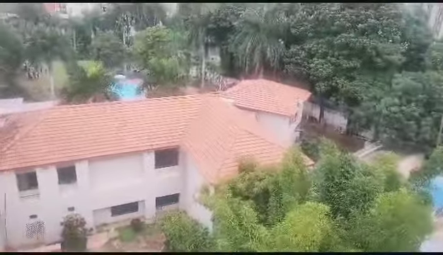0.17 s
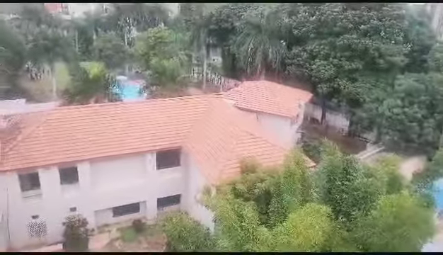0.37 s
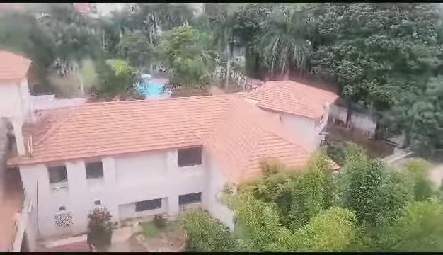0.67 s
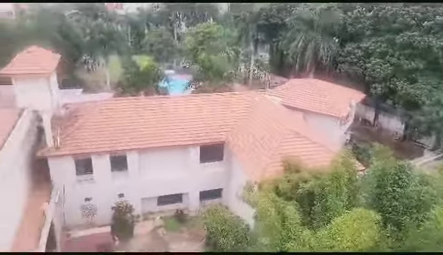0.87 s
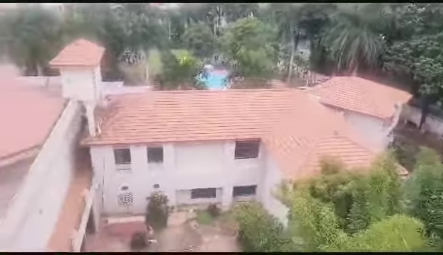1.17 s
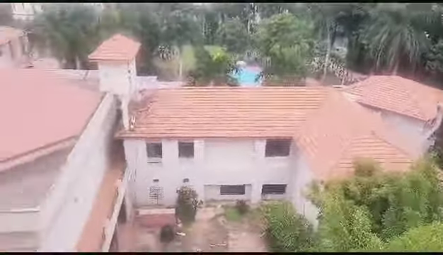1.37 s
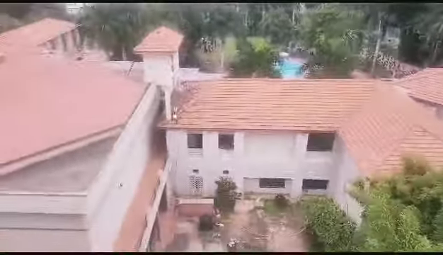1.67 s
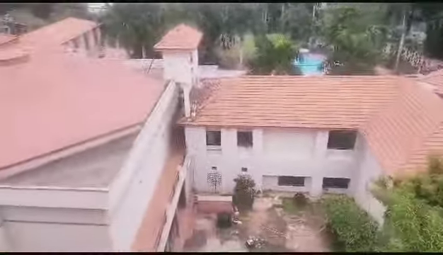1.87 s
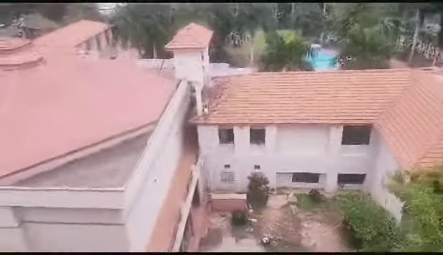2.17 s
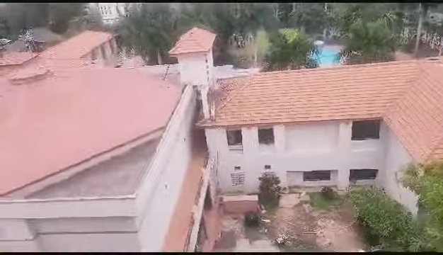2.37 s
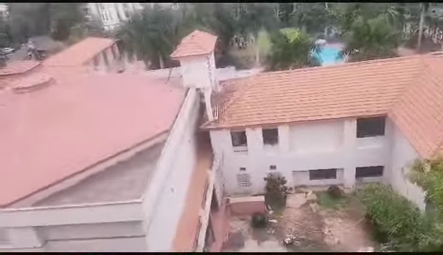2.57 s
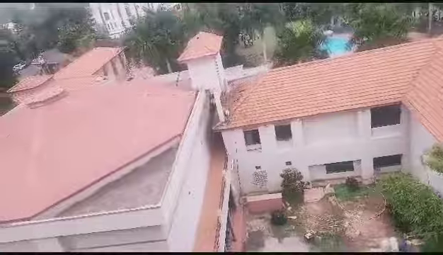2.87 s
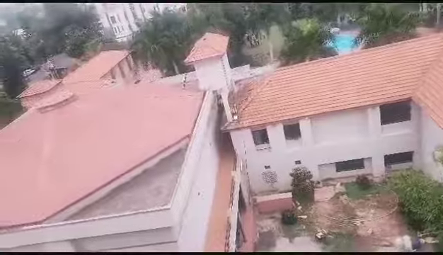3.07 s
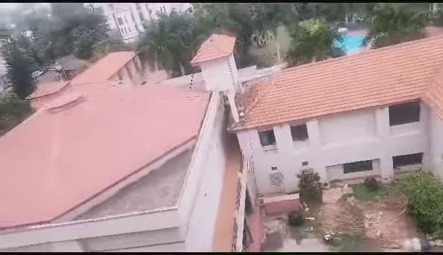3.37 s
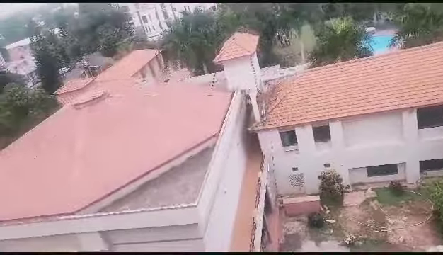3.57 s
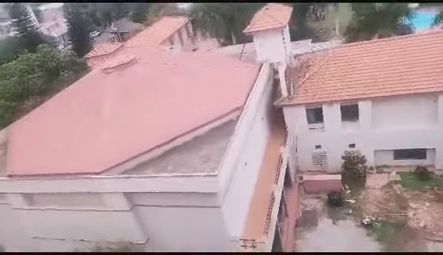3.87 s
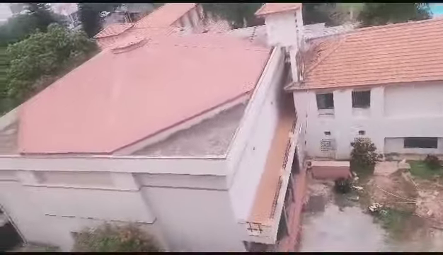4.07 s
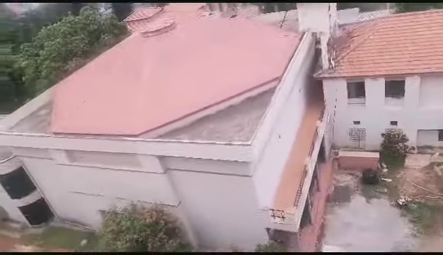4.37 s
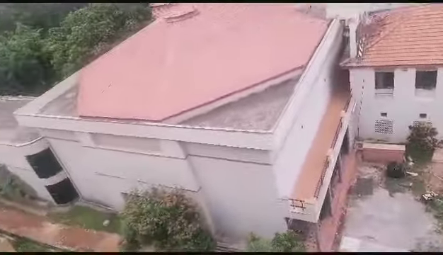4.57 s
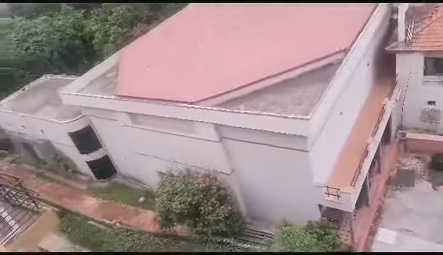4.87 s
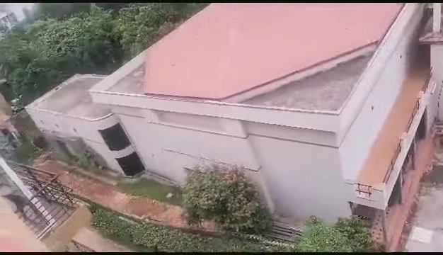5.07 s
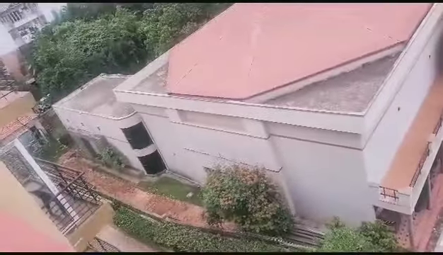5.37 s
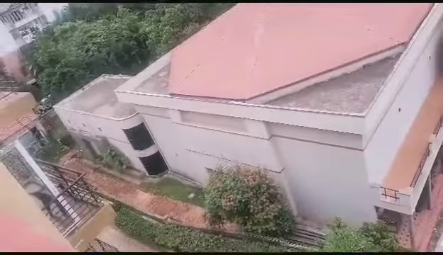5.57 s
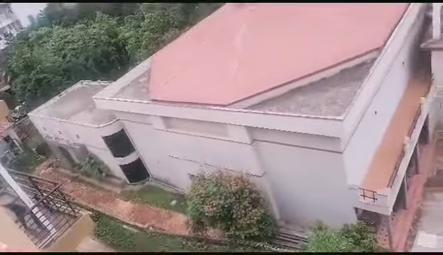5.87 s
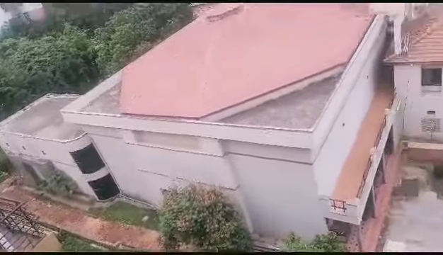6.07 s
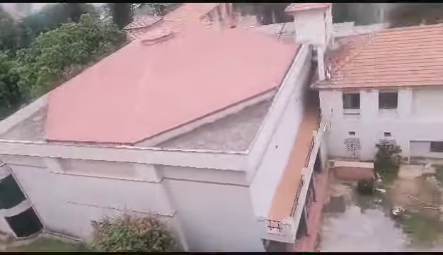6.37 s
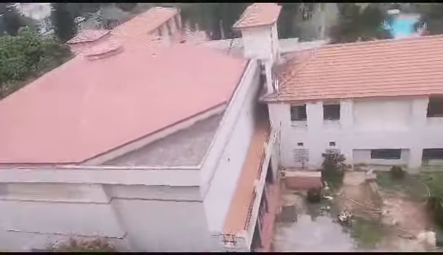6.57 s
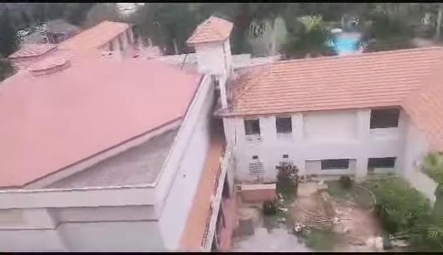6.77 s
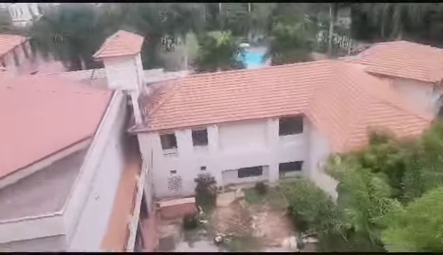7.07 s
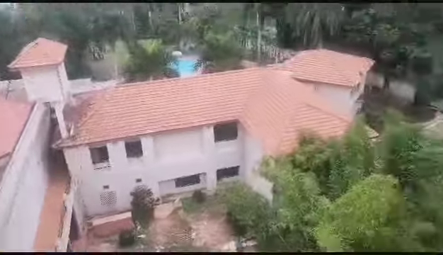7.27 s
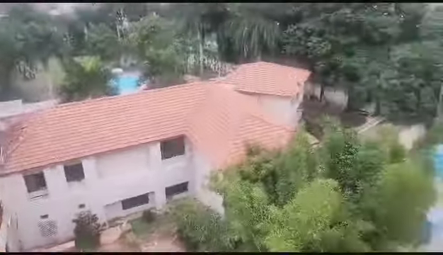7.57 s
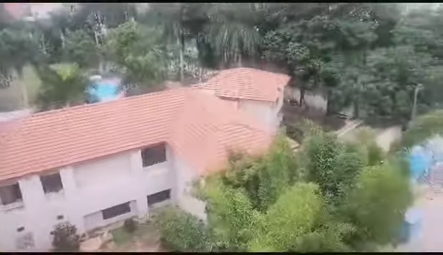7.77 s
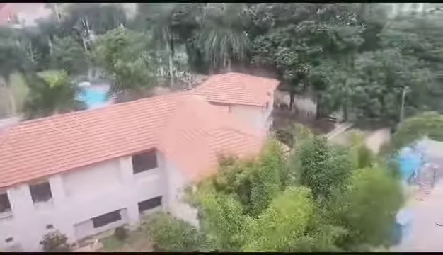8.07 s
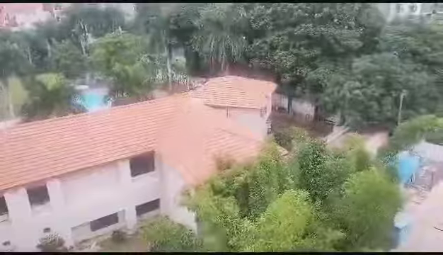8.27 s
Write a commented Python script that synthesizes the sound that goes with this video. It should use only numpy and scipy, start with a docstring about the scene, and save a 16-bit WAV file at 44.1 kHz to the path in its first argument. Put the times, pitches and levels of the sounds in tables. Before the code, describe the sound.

Rapid, steady demolition pounding reverberates among buildings and trees, distant but strong, over a rumbling engine and soft hiss. A few falling bird chirps slip between blows. The hammer slackens slightly in pitch and ceases, followed by gliding whistles, brief wind buffets, hollow swishing and rustling fingers on the stereo microphone. The machine noise dies down and one last bird whistles clearly.

```python
"""Courtyard from high above: a hydraulic breaker pounds about seven times a second, then stops.
Blows are short low sine pulses on several wall paths, with a scattered noise tail and yard resonances.
The chisel rings as narrow-band noise; engine rumble, roar, din and hiss are shaped noise.
The camera pans and turns back with a hollow swish, hand brushes and wind puffs, all swelling noise.
Birds in the trees whistle and chirp as gliding sines and rasp as pulsing noise."""
import sys
import numpy as np
from scipy import signal
from scipy.fft import rfft, irfft, next_fast_len
from scipy.io import wavfile
from scipy.ndimage import uniform_filter1d, map_coordinates

SR = 44100
rng = np.random.default_rng(int(sys.argv[2]) if len(sys.argv) > 2 else 0)


def unload_wav(signal):
    """Save mono or channel-first audio to the path in sys.argv[1] as 16-bit WAV at rate SR, clipped to [-1, 1]."""
    wavfile.write(
        sys.argv[1],
        SR,
        np.round(np.clip(np.atleast_2d(signal).T, -1, 1) * 32767).astype(np.int16),
    )


N = 371322
SIZE = next_fast_len(N, True)
TIME, HZ = np.arange(N) / SR, np.fft.rfftfreq(SIZE, 1 / SR)
# In all tables: levels are relative, half lengths are to 1/e, widths are nominal.

# piston blows: t/s, level/dB, first echo/dB
BLOWS = [(0.0104, -14.5, -4.0), (0.1691, -13.5, 0.0), (0.3173, -9.5, -5.5), (0.4572, -9.5, -3.5),
         (0.5952, -10.0, -0.5), (0.7366, -6.5, -3.5), (0.8807, -8.0, -1.0), (1.0257, -8.5, 0.5),
         (1.171, -9.0, 0.0), (1.3178, -8.0, -1.0), (1.4702, -9.5, 1.5), (1.621, -9.5, 1.0),
         (1.7706, -6.5, -2.0), (1.9187, -7.5, -1.0), (2.064, -9.5, 2.5), (2.2086, -7.5, -0.5),
         (2.3526, -8.5, 0.5), (2.4967, -8.0, 0.5), (2.641, -8.5, 0.0), (2.7853, -10.0, 1.5),
         (2.9285, -9.0, 0.5), (3.0706, -7.5, -1.0), (3.213, -6.5, -0.5), (3.3551, -7.0, -1.0),
         (3.4992, -7.5, -1.0), (3.6457, -7.5, -2.0), (3.7939, -7.0, -3.5), (3.9426, -7.5, -3.0),
         (4.0909, -7.5, -3.0), (4.2401, -8.5, -0.5), (4.3918, -10.0, 2.0), (4.5466, -9.0, -1.5),
         (4.6985, -9.5, 0.5), (4.8474, -9.0, -1.5), (4.9938, -7.5, -4.0), (5.1394, -9.5, 0.0),
         (5.286, -9.5, -1.5), (5.4342, -9.0, -3.0), (5.5838, -9.5, -2.0), (5.7346, -9.5, -1.0),
         (5.8864, -10.0, -0.5), (6.0392, -8.5, -0.5), (6.1928, -9.0, -3.0), (6.3519, -11.0, -2.0),
         (6.5137, -10.0, -6.0), (6.6734, -11.0, -3.0)]
# ground boom under a blow: t/s, level/dB
GROUND_BOOM = [(0, -11), (.7, -21), (1.8, -21), (2.2, -28), (3.8, -26), (4.6, -16), (5.2, -25), (5.8, -20)]
# the boom pulse: delay/s, f/Hz, half length/s
BOOM_PULSE = (0.05, 66, 0.043)
# direct path, then wall paths: delay/s, level/dB, f/Hz, half length/s
WALL_PATHS = [(.0092, 0, 172, .007), (.0217, -.4, 190, .0062), (.0391, -10, 135, .005),
              (.0528, -9.5, 155, .006), (.0722, -17, 470, .0024), (.0741, -10, 195, .005),
              (.0934, -11, 195, .0065), (.1025, -14, 220, .003), (.1128, -14, 215, .004)]


def breaker(thud_db=-0.62, wander_share=.009, wander_db=2.2, alike_blows=3,
            give_s=6.52, give_half_s=.14, give_drop_share=.14, uneven_share=.03):
    """Short low thuds over several paths, then a ground boom; pitch dips as the rubble gives way."""
    t, out = TIME[:SR // 5], np.zeros(N)
    boom_delay_s, boom_hz, boom_half_s = BOOM_PULSE
    # air and camera movement: path delays and levels wander, alike over neighbouring blows
    chance = rng.standard_normal((len(BLOWS), 2, len(WALL_PATHS)))
    chance = unit(uniform_filter1d(chance, size=alike_blows, axis=0))
    for (s, strength_db, echo_db), (late, loud) in zip(BLOWS, chance):
        firmness = 1 - give_drop_share * bump(s - give_s, give_half_s) + uneven_share * loud[0]
        extra_db = np.r_[0, echo_db, wander_db * loud[2:]]
        blow = np.zeros(len(t))
        for (delay_s, db, hz, half_s), extra, lag in zip(WALL_PATHS, extra_db, late):
            arrival_s = delay_s * (1 + wander_share * lag)
            blow += amp(db + extra) * thud(t - arrival_s, hz * firmness, half_s)
        boom_db = np.interp(s, *np.transpose(GROUND_BOOM))
        boom = amp(boom_db) * thud(t - boom_delay_s, boom_hz, boom_half_s)
        smooth_onset = 1 - bump(t, 0.00092)
        add(out, s, amp(strength_db + thud_db) * (blow + boom) * smooth_onset)
    return out


def thud(t, hz, half_s):
    """A few rounded cycles of pressure."""
    return bump(t, half_s) * np.sin(2 * np.pi * hz * t)


# spectrum of the courtyard's dense answer: f/Hz, density/(dB per Hz)
CLATTER_SPECTRUM = [(30, -44), (62, 0), (90, -6), (125, -4.5), (195, 3.5), (240, -2.5), (320, -10.5),
                    (470, -17.5), (750, -17.5), (1100, -28), (2000, -38), (3500, -62)]


def courtyard(level_db=-29):
    """Dense scattered clatter after every blow."""
    return amp(level_db) * echoes(amp(read(CLATTER_SPECTRUM)))


def echoes(gain, t60_s=1.3, build_s=.03):
    """Blows excite decaying noise tails; two tails cross slowly, so neighbouring blows sound alike."""
    s, strength_db, _ = np.transpose(BLOWS)
    at, t = np.round(s * SR).astype(int), TIME[:SR]
    turn = np.pi * s / s[-1]
    envelope = amp(-60 * t / t60_s) * (1 - bump(t, build_s))
    tails = noise(gain)[:, :2 * SR].reshape(2, 2, SR) * envelope
    shares = np.cos(turn), np.sin(turn)
    strikes = np.array([np.bincount(at, share * amp(strength_db), N) for share in shares])
    return unit(signal.fftconvolve(strikes[None], tails, axes=2).sum(1)[:, :N])


# resonances between walls: f/Hz, width/Hz, level/dB, heading/ms, spread/ms, level facing away/dB
YARD_MODES = [(312, 50, -35.5, .3, .07, -14), (452, 57, -37, .35, .05, -10), (510, 220, -38, -.2, .3, -14)]


def resonances(fade_db_per_s=16.0, engine_power_share=0.57):
    """Engine noise and blows ring the yard's modes; each swells as the camera turns towards it."""
    heading_ms, out = curves(HEADING)[0], 0
    for hz, width_hz, db, best_ms, spread_ms, away_db in YARD_MODES:
        mode = peak(hz, width_hz)
        engine = np.sqrt(engine_power_share) * amp(lull(fade_db_per_s)) * noise(mode)
        blows = np.sqrt(1 - engine_power_share) * echoes(mode)
        facing = amp(away_db) + bump(heading_ms - best_ms, spread_ms)
        out = out + amp(db) * facing * (engine + blows)
    return out


# steady chisel modes: f/Hz, width/Hz, level/dB
STEADY_MODES = [(1525, 40, -63), (2746, 16, -65), (2890, 26, -66), (5600, 27, -70.5), (5776, 50, -74),
                (5980, 30, -70), (6440, 50, -74), (7501, 28, -73.5)]
# modes that vary as the chisel bites: f/Hz, width/Hz, level/dB, gain per treble rise/(dB per dB)
BITING_MODES = [(1715, 35, -52.4, .5), (2780, 24, -62.5, 1.2), (3945, 100, -66.5, .5), (4432, 24, -64, 1.1),
                (5285, 45, -68.5, .5)]
# mode flare-ups: t/s, half length/s, f/Hz, rise/dB
MODE_FLARES = [(.3, .42, 4432, 10), (.95, .18, 4432, 7.5), (3.0, .28, 1715, 3.5), (3.15, .4, 3945, 10),
               (4.25, .5, 3945, 12), (4.9, .6, 1715, 1.5), (5.2, .5, 3945, 7), (6.8, .55, 4432, 7.5),
               (6.85, .25, 1715, 4.5), (7.19, .1, 1715, 9), (7.38, .36, 5285, 17.5), (7.48, .3, 2780, 15.5),
               (7.6, .25, 4432, 9)]


def chisel(steady_db=2.0, fade_db_per_s=3.0, waver_db=2.0, same_mode_share=.07):
    """Steel rings without a break as narrow-band noise; some modes flare up."""
    bright_db, fade_db = brightness(), lull(fade_db_per_s)
    modes = sum(amp(db) * noise(peak(hz, width_hz)) for hz, width_hz, db in STEADY_MODES)
    ring = amp(steady_db + bright_db + fade_db / 2) * modes
    for hz, width_hz, db, follow in BITING_MODES:
        flare_db = sum(rise_db * bump(TIME - s, half_s) for s, half_s, mode_hz, rise_db in MODE_FLARES
                       if abs(mode_hz / hz - 1) < same_mode_share)
        level_db = db + follow * bright_db + flare_db + fade_db + waver_db * drift(5.3)
        ring += amp(level_db) * ringing(hz, width_hz)
    return ring


def ringing(hz, width_hz, size=2200):
    """A mode struck again before it dies: smeared in pitch, nearly even in level."""
    x = noise(peak(hz, width_hz))
    power = abs(uniform_filter1d((x ** 2).mean(0), size))
    return unit(x / (power + 1e-9) ** .4)


# hollow modes of the nook: f/Hz, width/Hz, level/dB
NOOK_MODES = [(260, 32, 3.5), (678, 60, -0.5), (3020, 36, -10.5)]
# swell as the camera turns into the nook: t/s, level/dB
NOOK_SWELL = [(0, -97.5), (6.5, -62), (7, -40.5), (7.3, -43), (7.55, -43), (7.8, -47.5), (8.0, -47),
              (8.42, -49.5)]
# hollow bursts in the swish: t/s, f/Hz, width/Hz, half length/s, level/dB
SWISH_BURSTS = [(7.09, 675, 40, .045, -40.5), (7.28, 745, 90, .07, -43), (7.43, 810, 110, .05, -41),
                (7.49, 1450, 330, .07, -46.5), (7.55, 660, 60, .055, -37)]


def nook(rough_db=5.0):
    """Din resounds in a small hollow beside the camera, with a few rough bursts."""
    modes = sum(amp(db) * noise(peak(hz, width_hz)) for hz, width_hz, db in NOOK_MODES)
    hollow = amp(curves(NOOK_SWELL)[0]) * modes
    return hollow + bursts(SWISH_BURSTS) * amp(rough_db * drift(61))


# puffs: t/s, half length/s, level/dB
WIND_PUFFS = [(6.78, 0.067, -21.5), (6.942, 0.018, -17.5), (7.08, 0.25, -25.5), (7.295, 0.0038, -16),
              (7.348, 0.016, -19.5), (7.52, 0.022, -19), (7.885, 0.014, -21.5)]
# puff spectrum: f/Hz, density/(dB per Hz)
PUFF_SPECTRUM = [(15, -16), (40, 0.5), (65, 7), (110, -5), (200, -1.5), (1000, -78)]


def wind():
    """Low noise swells as air buffets mostly the right port."""
    return swells(WIND_PUFFS, PUFF_SPECTRUM) * amp([[-14], [0]])


# brushes: t/s, half length/s, level/dB
HAND_BRUSHES = [(7.265, 0.032, -50), (7.42, 0.031, -46), (7.54, 0.093, -47.5)]
# brush spectrum: f/Hz, density/(dB per Hz)
BRUSH_SPECTRUM = [(600, -12), (1400, -4), (2200, -21), (3800, 15), (5500, 8), (7200, 6), (8500, -26),
                  (10900, -4), (12000, -17), (15000, -26)]


def hand(rustle_db=2):
    """Skin sticks and slips on the camera: noise swells of fluttering level."""
    return swells(HAND_BRUSHES, BRUSH_SPECTRUM) * amp(rustle_db * drift(90))


# one table per whistle: t/s, f/Hz, level/dB, hoarseness/share of f
BIRD_WHISTLES = [
    [(6.335, 3450, -50, .01), (6.365, 3250, -42.5, .02), (6.44, 3000, -41, .04), (6.49, 2890, -38, .02),
     (6.525, 2800, -34, .022), (6.55, 2840, -54, .03)],
    [(6.57, 2830, -47, .02), (6.67, 2590, -41, .025), (6.71, 2720, -52, .02)],
    [(6.57, 2900, -47, .006), (6.68, 2860, -45, .012), (6.77, 2895, -38.5, .012), (6.85, 2935, -39, .012),
     (6.95, 2880, -39, .024), (7.05, 2720, -39.5, .018), (7.11, 2640, -52, .015), (7.17, 2490, -44, .015)],
    [(8.02, 3480, -48, .008), (8.06, 3380, -39.5, .012), (8.1, 3230, -42, .016), (8.17, 3010, -40, .026),
     (8.23, 2810, -32.5, .022), (8.27, 2920, -44, .035)],
    [(8.09, 3480, -53, .02), (8.13, 3420, -48, .03), (8.27, 3180, -48, .045)],
]
# falling chirps: t/s, length/s, from f/Hz, to f/Hz, level/dB
BIRD_CHIRPS = [(4.571, .023, 3600, 2580, -40), (4.601, .02, 3500, 2500, -39.5),
               (4.619, .012, 3150, 2850, -42), (4.847, .014, 3400, 2650, -42),
               (4.879, .018, 3900, 2400, -40.5), (4.904, .017, 3750, 2600, -39.5),
               (5.145, .009, 3300, 3000, -42), (5.155, .028, 2800, 2550, -42),
               (5.192, .02, 3300, 2500, -41.5)]
# rasping calls: t/s, f/Hz, width/Hz, half length/s, level/dB
BIRD_RASPS = [(6.974, 4900, 202, 0.015, -52), (7.254, 3900, 400, 0.028, -49),
              (7.258, 7300, 700, 0.017, -51)]


def birds(direct_db=-3, echo_db=-5.5, rasp_hz=45, trees_t60_s=.3):
    """Hoarse gliding whistles and falling chirps, blurred by the trees, and pulsing noise rasps."""
    song = np.zeros(N)
    for rows in BIRD_WHISTLES:
        hz, db, hoarse = curves(rows)
        sounding = (TIME > rows[0][0]) & (TIME < rows[-1][0])
        pitch_hz = hz * (1 + hoarse * drift(191.0))
        song += sounding * amp(db) * np.sin(2 * np.pi * np.cumsum(pitch_hz) / SR)
    for s, length_s, from_hz, to_hz, db in BIRD_CHIRPS:
        u = np.linspace(0, 1, round(length_s * SR))
        fall_hz = from_hz * (to_hz / from_hz) ** u
        chirp = np.sin(np.pi * u) * np.sin(2 * np.pi * np.cumsum(fall_hz) / SR)
        add(song, s, amp(db) * chirp)
    tail = rng.standard_normal((2, SR)) * amp(-60 * TIME[:SR] / trees_t60_s)
    echo = signal.oaconvolve(song[None], tail / np.linalg.norm(tail[0]), axes=1)[:, :N]
    rattle = 1 + .5 * np.sin(2 * np.pi * rasp_hz * TIME)
    rasps = bursts(BIRD_RASPS) * rattle * amp([[-4], [3]])
    return amp(direct_db) * song + amp(echo_db) * echo + rasps


# background: t/s, midrange level/dB, treble level/dB
BACKGROUND_LEVELS = [(0.0, -41, -53.5), (0.28, -42, -52.5), (1.3, -43.5, -57.5), (3.33, -43, -56),
                     (4.81, -40, -57.5), (6.63, -44.5, -59.5), (7.04, -45, -54.5), (7.32, -45.5, -53),
                     (7.48, -40, -50), (7.78, -44, -57), (8.0, -47.5, -60), (8.42, -50.5, -58.5)]
# engine rumble under load: t/s, level/dB
ENGINE_LOAD = [(0, -24.5), (1, -28), (3.5, -27.5), (5.2, -30), (5.7, -27), (6.7, -29), (7.6, -35.5),
               (8.42, -43)]
# spectra of engine rumble, yard roar, far din, hiss, finest hiss: f/Hz, density/(dB per Hz)
RUMBLE_SPECTRUM = [(15, -42), (30, -15), (48, 1), (63, 1.5), (78, -0.5), (100, 2), (135, -7.5), (220, -36),
                   (500, -93)]
ROAR_SPECTRUM = [(70, -15), (120, -2), (200, -4), (255, -1), (300, -4.5), (400, -10.5), (520, -24),
                 (800, -24), (2000, -81)]
DIN_SPECTRUM = [(250, 0.5), (480, 0.5), (720, 0), (950, -5.5), (1200, -4.5), (1500, -10.5), (2200, -16.5),
                (2800, -17), (3500, -44.5), (8000, -50)]
HISS_SPECTRUM = [(1200, 1), (2200, 2), (2800, 7), (3400, 4.5), (4800, 0.5), (6600, -2), (7700, -5.5),
                 (8600, -17), (11000, -28)]
FIZZ_SPECTRUM = [(7000, -26.5), (8500, -3.5), (9400, 5.5), (11000, 2), (12300, 0), (14000, -18),
                 (15000, -23), (15500, -54)]


def site(roar_db=-28, roar_db_per_ms=14, roar_follow=0.23, roar_fade_db_per_s=6.0,
         din_db=6.5, hiss_db=-48.5, fizz_db=-66, fizz_follow=1.34):
    """Five fluttering noise layers; the roar grows with the blows and as the camera turns left."""
    roar_level_db = (roar_db + roar_follow * curves(BLOWS)[0]
                     + roar_db_per_ms * curves(HEADING)[0] + lull(roar_fade_db_per_s))
    layers = [(RUMBLE_SPECTRUM, curves(ENGINE_LOAD)[0]),
              (ROAR_SPECTRUM, roar_level_db),
              (DIN_SPECTRUM, din_db + curves(BACKGROUND_LEVELS)[0]),
              (HISS_SPECTRUM, hiss_db + brightness()),
              (FIZZ_SPECTRUM, fizz_db + fizz_follow * brightness())]
    return sum(amp(level_db + .5 * drift(24)) * noise(amp(read(spectrum)))
               for spectrum, level_db in layers)


def brightness():
    """Treble level above its median over the background's course (dB)."""
    treble_db = curves(BACKGROUND_LEVELS)[1]
    return treble_db - np.median(treble_db)


def lull(db_per_s, stop_s=6.7):
    """Machine noise dies down steadily once the hammering stops (dB)."""
    return -db_per_s * np.maximum(TIME - stop_s, 0)


# camera heading: t/s, left port lag/ms
HEADING = [(0, -.27), (.7, -.22), (1.25, .02), (1.8, .15), (3.3, .19), (4.3, .29), (5.7, .36), (6.75, .26),
           (7.7, -.23), (8.42, -.19)]
# port colour: f/Hz, left minus right/dB
PORT_TILT = [(60, -1.5), (150, -0.5), (600, -1.5), (1300, -1), (2400, -3), (4400, -3.5), (6500, -6.5),
             (8500, 1), (13000, 4)]


def panned(x):
    """The turning camera delays one port against the other; each port has its own colour."""
    lag = curves(HEADING)[0] * SR / 1000  # samples
    ports = [map_coordinates(port, [np.arange(N) + side * lag / 2], order=3, mode="mirror")
             for port, side in zip(x, (-1, 1))]
    colour = amp(np.outer([1, -1], read(PORT_TILT) / 2))
    return irfft(rfft(ports, SIZE) * colour, SIZE)[:, :N]


# port likeness: f/Hz, shared power/share (limited to 0..1)
PORT_LIKENESS = [(30, -1), (70, 1), (150, 0.97), (300, 0.94), (700, 0.77), (1400, 0.43), (2800, -0.14),
                 (6000, 0.23), (12000, -0.33)]


def noise(gain):
    """Unit-rms noise of the given spectrum at both ports, most alike in the bass."""
    shared, left, right = rng.standard_normal((3, 2 * len(HZ))).view(complex)
    same = np.clip(read(PORT_LIKENESS), 0, 1)
    ports = np.sqrt(same) * shared + np.sqrt(1 - same) * np.array([left, right])
    return unit(irfft(gain * ports, SIZE)[:, :N])


def swells(rows, spectrum):
    """Short swells of noise of one colour."""
    envelope = sum(amp(db) * bump(TIME - s, half_s) for s, half_s, db in rows)
    return noise(amp(read(spectrum))) * envelope


def bursts(rows):
    """Short swells of noise, each in its own resonance."""
    return sum(amp(db) * bump(TIME - s, half_s) * noise(peak(hz, width_hz))
               for s, hz, width_hz, half_s, db in rows)


def peak(hz, width_hz):
    """Gain of a steep-sided resonance."""
    return 1 / (1 + ((HZ - hz) / (0.63 * width_hz)) ** 2)


def bump(t, half):
    """Gaussian swell around t = 0, down to 1/e at half."""
    return np.exp(-(t / half) ** 2)


def drift(rate_hz):
    """Slow chance variation of rms 1."""
    return unit(irfft(rfft(rng.standard_normal(SIZE)) * bump(HZ, rate_hz), SIZE)[:N])


def add(mix, s, sound):
    """Mixes a sound in at time s."""
    part = mix[max(round(s * SR), 0):][:len(sound)]
    part += sound[:len(part)]


def amp(db):
    """Decibels to gain."""
    return 10 ** (np.asarray(db) / 20)


def unit(x):
    """Scales to rms 1."""
    return x / np.sqrt(np.mean(x ** 2) + 1e-20)


def read(points):
    """A table of f/Hz and value, joined on a log frequency axis."""
    hz, value = np.transpose(points)
    return np.interp(np.log(HZ + 1), np.log(hz + 1), value)


def curves(rows):
    """Each column after t/s, interpolated at every sample."""
    s, *columns = np.transpose(rows)
    return [np.interp(TIME, s, column) for column in columns]


def scene():
    """Everything outdoors reaches the turning camera; wind and hand touch it directly."""
    machine = breaker() + courtyard() + resonances() + chisel()
    outdoors = panned(machine + nook() + birds() + site())
    return outdoors + wind() + hand()


def record(dry, edge_hz=15150):
    """4 ms fades at the ends, then a low-pass band limit."""
    ends = np.minimum(np.minimum(TIME, TIME[::-1]) / .004, 1)
    low_pass = signal.firwin(511, edge_hz, window=("kaiser", 9), fs=SR)
    return signal.oaconvolve(dry * ends, low_pass[None], "same")


dry = scene()
out = record(dry)
unload_wav(out)
```